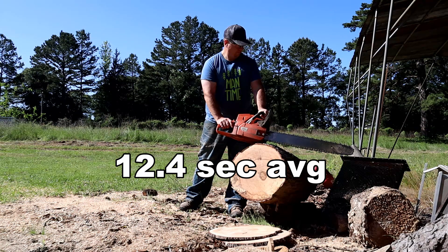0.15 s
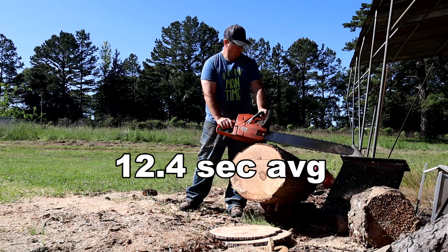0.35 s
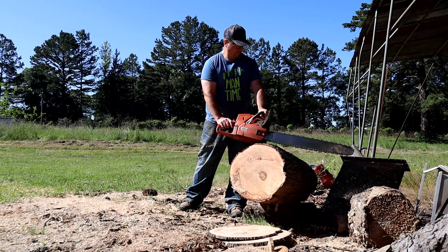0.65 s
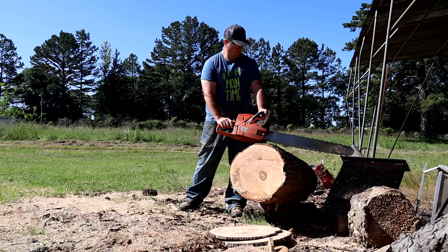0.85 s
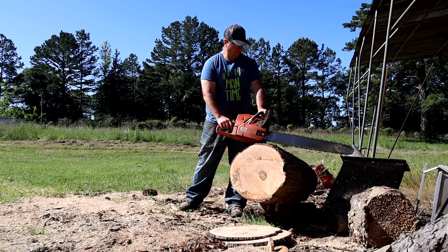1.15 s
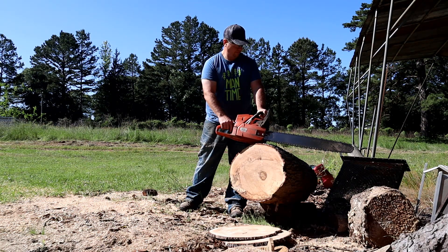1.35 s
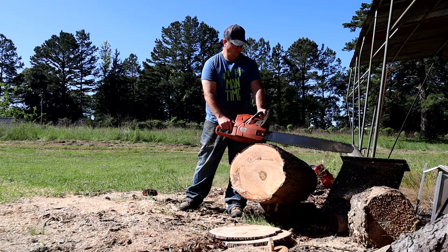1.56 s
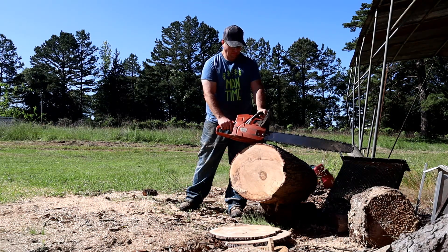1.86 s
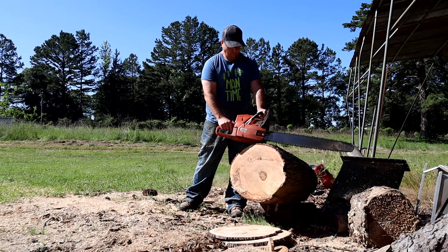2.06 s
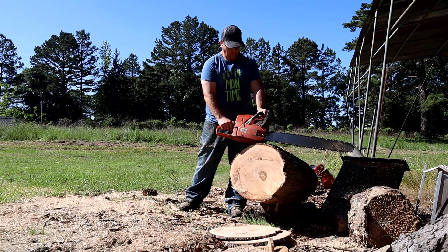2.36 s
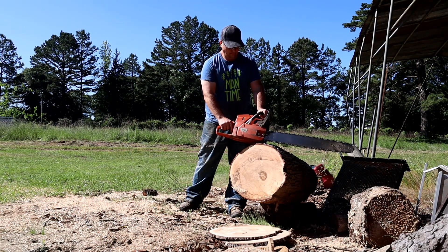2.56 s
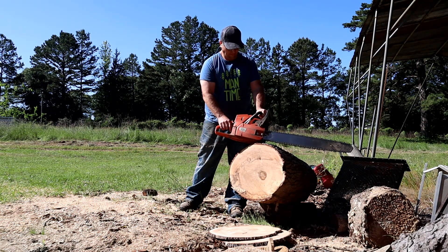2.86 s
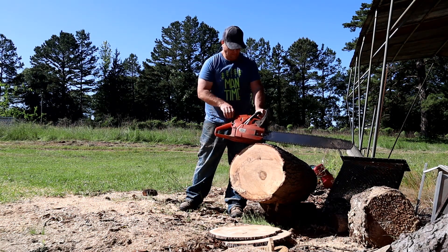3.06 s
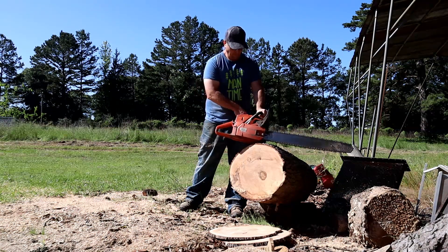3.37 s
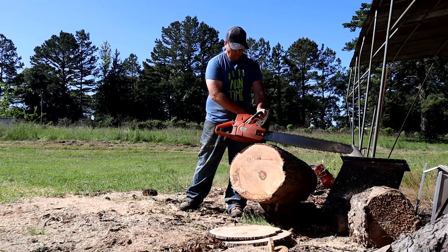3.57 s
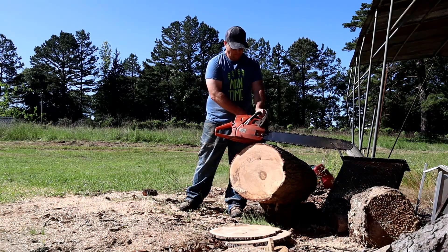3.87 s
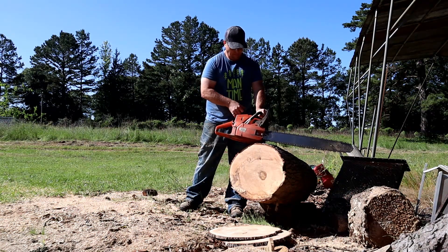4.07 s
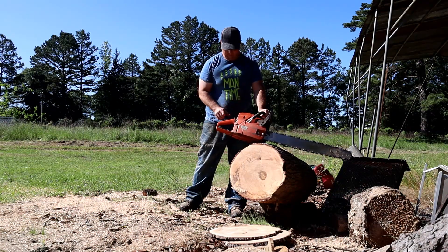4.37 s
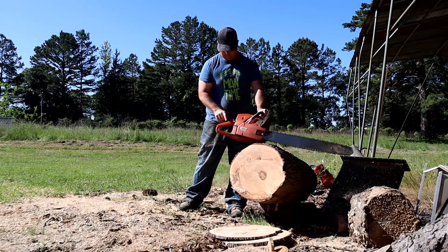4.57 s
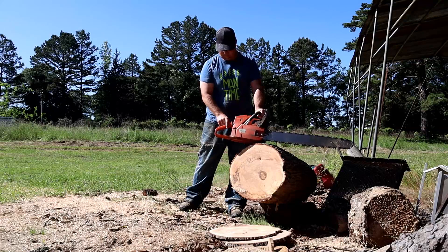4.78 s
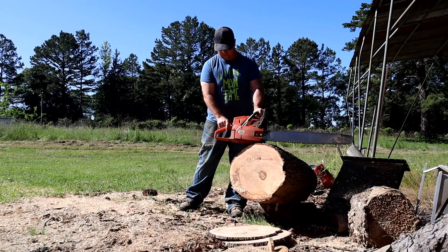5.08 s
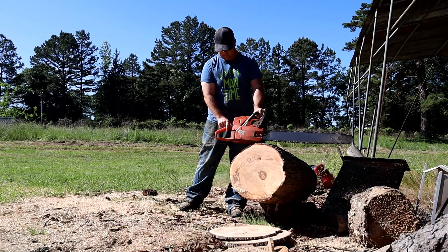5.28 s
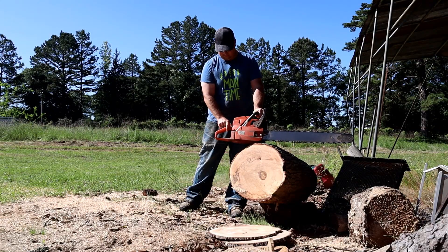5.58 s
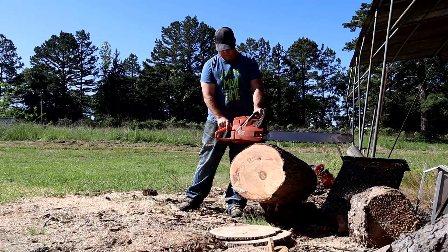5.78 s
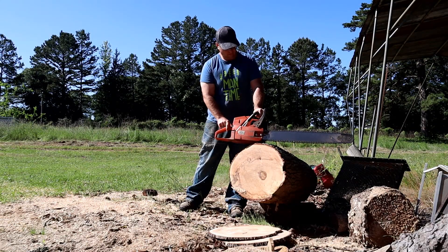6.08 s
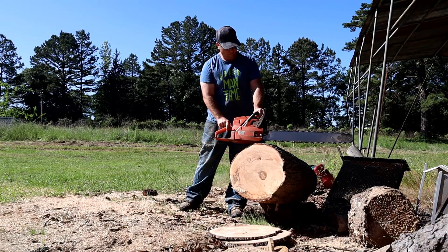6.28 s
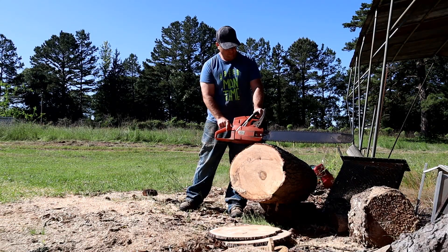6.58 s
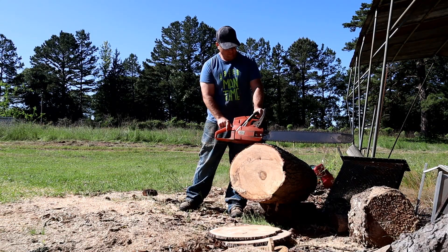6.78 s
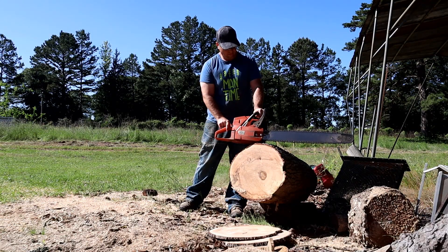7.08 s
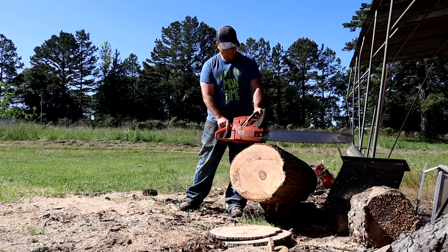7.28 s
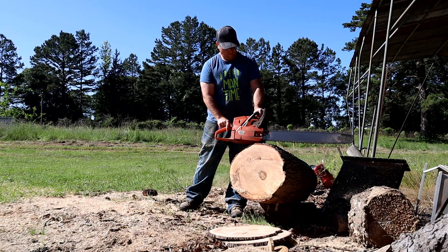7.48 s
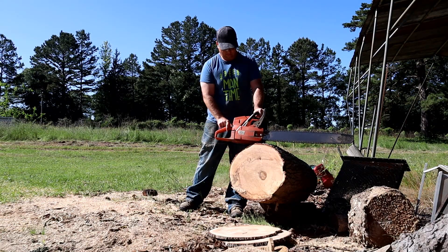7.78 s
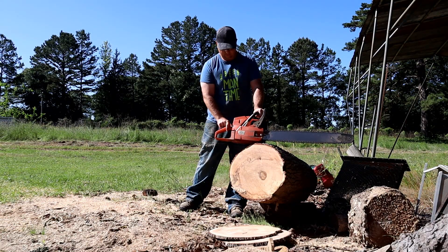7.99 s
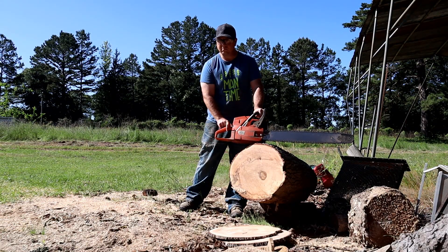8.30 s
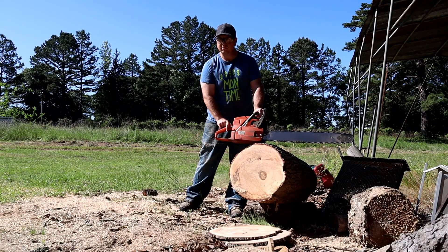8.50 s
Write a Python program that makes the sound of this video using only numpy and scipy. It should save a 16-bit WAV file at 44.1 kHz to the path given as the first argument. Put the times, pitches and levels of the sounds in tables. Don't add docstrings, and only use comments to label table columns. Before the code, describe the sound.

Rough two-stroke chainsaw idle, irregular sharp bangs between softer puffs, loose parts rattling and a thin high metal whine coming and going.

```python
import sys
import numpy as np
from scipy import signal
from scipy.fft import rfft, irfft
from scipy.io import wavfile
from scipy.ndimage import uniform_filter1d

SR = 44100
rng = np.random.default_rng(int(sys.argv[2]) if len(sys.argv) > 2 else 0)


def file_out(sig):
    cols = np.atleast_2d(sig).T
    lim = np.clip(cols, -1, 1)
    pcm = np.round(lim * 32767).astype(np.int16)
    wavfile.write(sys.argv[1], SR, pcm)


def makeup_ratio(level_db):
    decades = np.asarray(level_db, float) / 20
    return 10 ** decades


N = 381024
T = np.arange(N) / SR


def level(x, db):
    return x * makeup_ratio(db) / np.sqrt(np.mean(x ** 2))


def colour(x, table):
    hz, db = np.transpose(table)
    f = np.arange(N // 2 + 1) * SR / N + 1
    gain = makeup_ratio(np.interp(np.log(f), np.log(hz), db))
    return irfft(rfft(x) * gain, N)


def noise(table):
    return colour(rng.standard_normal(N), table)


def train(times, sizes, shape):
    clicks = np.zeros(N + SR)
    starts = np.round(np.clip(times, 0, None) * SR).astype(int)
    np.add.at(clicks, starts, sizes)
    return signal.fftconvolve(clicks[:N], shape)[:N]


def push(delay_ms, length_ms):
    puff = np.hanning(int(length_ms * SR / 1000) + 1)
    return np.r_[np.zeros(int(delay_ms * SR / 1000)), puff / puff.sum()]


def dying_sine(t, hz, t60_s):
    return np.sin(2 * np.pi * hz * t) * np.exp(-np.log(1000) * t / t60_s)


def rings(modes):
    t = T[:SR // 10]
    return sum(gain * dying_sine(t, hz, t60_ms / 1000) for hz, t60_ms, gain in modes)


def burst(rise_ms, fall_ms):
    ms = T[:SR // 10] * 1000
    shape = (1 - np.exp(-ms / rise_ms)) ** 2 * np.exp(-ms / fall_ms)
    return shape / shape.max()


def resonance(x, hz, q):
    return signal.lfilter(*signal.iirpeak(hz, q, fs=SR), x)


FULL_BURNS = [.0949, .3723, .4629, .6987, 1.0452, 1.5969, 2.8712, 3.1927, 3.5173, 4.0245, 4.1311, 4.3799,
              4.6478, 5.1595, 6.2493, 6.3248, 6.6796, 6.8631, 6.9925, 7.0661, 7.3955, 7.6209, 8.5407]
# start in seconds, burn strength
PARTIAL_BURNS = [(.299, .92), (.6086, .96), (.7888, .96), (.9722, .92), (1.134, .96), (1.3749, .92),
                 (1.7061, .96), (1.966, .96), (2.0959, .8), (2.3873, .84), (2.6579, .92), (3.1181, .96),
                 (3.6851, .8), (3.875, .84), (3.9499, .92), (4.2177, .84), (4.289, .92), (4.5762, .92),
                 (4.8469, .96), (5.0691, .96), (5.6485, .96), (5.8974, .88), (6.4177, .96), (6.4912, .84),
                 (7.3182, .92), (7.7326, .84), (8.0006, .8), (8.3065, .92),
                 (.0193, .76), (.5535, .64), (.8603, .56), (1.2808, .64), (1.4849, .64), (1.5404, .52),
                 (1.8895, .68), (2.5207, .52), (2.9644, .76), (3.3228, .56), (3.361, .56), (3.7987, .6),
                 (4.4849, .64), (4.791, .52), (4.9758, .6), (5.0316, .52), (5.3595, .64), (5.5127, .72),
                 (5.8009, .52), (5.8395, .6), (6.051, .6), (6.1099, .68), (6.5466, .6), (7.4875, .68),
                 (7.9427, .72), (8.1336, .52), (8.1715, .6), (8.4808, .52), (8.616, .55)]
WEAK_BURNS = [.9344, 2.2894, 2.5788, 2.734, 2.7924, 3.0403, 3.2845, 3.458, 3.5906, 3.7413, 4.5395, 4.7181,
              4.9386, 5.2475, 5.2844, 5.474, 5.5901, 5.723, 5.973, 6.6031, 8.2285, 8.2675]


def crank():
    turn_s = 18.8 / 1000
    slowing_ms, slowing_turns = 1.9, 2.3
    coast_ms_per_turn, wobble_ms = .06, .15
    clearing_turns, sputter_chance, sputter_burn = 3.2, .62, (.1, .3)

    full = [(s, 1.06) for s in FULL_BURNS]
    weak = [(s, .42) for s in WEAK_BURNS]
    fired = sorted(full + PARTIAL_BURNS + weak)
    fired = [(fired[0][0] - turn_s, 0.)] + fired + [(fired[-1][0] + turn_s, 0.)]
    times, burn = [fired[0][0]], [fired[0][1]]
    for (t0, kick), (t1, strength) in zip(fired, fired[1:]):
        turn = np.arange(round((t1 - t0) / turn_s))
        slowing = kick ** 2 * slowing_ms * np.tanh(turn / slowing_turns)
        drag = (slowing + coast_ms_per_turn * turn) / 1000
        drag = drag + wobble_ms / 1000 * rng.standard_normal(len(turn))
        mean_turn = (t1 - t0 - drag.sum()) / len(turn)
        times += list(t0 + np.cumsum(drag + mean_turn))
        lights = rng.random(len(turn)) < sputter_chance
        cleared = turn + 1 > clearing_turns * kick
        sputter = rng.uniform(*sputter_burn, len(turn)) * lights * cleared
        burn += list(sputter[:-1]) + [strength]
    return np.array(times), np.array(burn)


# burn strength from 0 to 1, blow-out length in ms, suck-back volume,
# suck-back delay in ms, suck-back length in ms, sweep volume.
GAS_EXCHANGE = [(0, .5, .45, .2, 1.69, .78), (.15, .52, .6, .66, 1.2, .88), (.3, .7, .8, .6, 1.85, 1.04),
                (.6, .99, .8, .59, 2.17, .9), (1, 1.05, 0, .65, 2.06, .2)]
# frequency in Hz, t60 in ms, signed gain.
MUFFLER_RINGS = [(169, 19.4, 1.336), (305, 10.5, 2.551), (262, 4.0, -8.999), (519, 11.9, 0.583),
                 (677, 17.7, -0.175), (915, 20.5, 0.332), (1231, 11.9, -0.409)]
# frequency in Hz, t60 in ms, signed gain.
INTAKE_RINGS = [(204, 50.4, 0.036), (323, 33.7, 0.125)]
# frequency in Hz, gain in dB.
EXHAUST_COLOUR = [(100, 2), (250, 1), (420, 1.5), (560, 1), (690, -2), (860, 2.5), (960, -2.5), (1250, 1),
                  (1800, 8.5)]


def exhaust(times, burn):
    chance = rng.standard_normal((len(times), 3)).T
    blow = burn + (burn == 0) * .045 * np.abs(chance[0])
    strength, *columns = np.transpose(GAS_EXCHANGE)
    out_ms, back, back_delay, back_ms, sweep = [np.interp(blow, strength, c) for c in columns]
    flow, shock = np.zeros((2, N + SR))
    for i, s in enumerate(times):
        at = round(s * SR)
        steepness = min(blow[i], 1.05) ** 2.5
        blow_out = blow[i] * push(.22, out_ms[i])
        suck_back = -back[i] * push(back_delay[i], back_ms[i])
        for puff in (blow_out, suck_back):
            flow[at:at + len(puff)] += puff
            shock[at:at + len(puff)] += puff * steepness
    flow = flow[:N] + train(times, sweep * makeup_ratio(.7 * chance[1]), push(.4, 2.85))
    slap = train(times, (1 - .27 * burn) * makeup_ratio(1.5 * chance[2]), push(7.04, .3))
    parts = (flow, MUFFLER_RINGS[:-1]), (shock[:N], MUFFLER_RINGS[-1:]), (slap, INTAKE_RINGS)
    sound = sum(signal.fftconvolve(drive, rings(modes))[:N] for drive, modes in parts)
    return makeup_ratio(-0.27) * colour(sound, EXHAUST_COLOUR)


# frequency in Hz, level in dB per Hz.
SPIT_COLOUR = [(700, 7), (1200, -17), (1550, -5.5), (2400, 1), (3600, 2), (5200, -5.5), (6200, -15),
               (8600, 5.5), (10800, -9), (13300, -15.5), (15000, -30)]
# frequency in Hz, level in dB per Hz.
HISS_COLOUR = [(700, -10), (1200, 0), (1600, -17), (2350, 5), (2800, -8), (3700, 0), (5000, -9), (6100, -3),
               (8600, -11.5), (11000, -18.5), (13300, -12)]


def crack(times, burn):
    scatter = makeup_ratio(rng.standard_normal(len(times)))
    spit = level(noise(SPIT_COLOUR), -15.5)
    hiss = level(noise(HISS_COLOUR), -22.5)
    spit = spit * train(times + 0.001, burn ** 1.68 * scatter, burst(1.2, .5))
    hiss = hiss * train(times + 0.00024, burn ** 2.0 * scatter, burst(1.0, 4.2))
    return spit + hiss


# frequency in Hz, level in dB per Hz.
RATTLE_COLOUR = [(400, -12), (800, 2.5), (1250, -2.5), (1700, -9.5), (2400, -4), (3600, -9.5), (4500, -15),
                 (6000, -12.5), (8800, -10.5), (10500, -21.5), (13200, -20.5), (14300, -39), (15500, -56)]
# frequency in Hz, width in Hz, gain in dB.
CASE_MODES = [(1628, 59, -6), (1933, 78, 3), (2777, 17, -4.5), (3060, 70, -9), (3410, 65, -5),
              (3680, 82, -14.5), (6370, 13, -62)]


def rattle(times, burn):
    chance = rng.standard_normal((len(times), 2)).T
    hardness = makeup_ratio(1.5 * chance[0]) * makeup_ratio(2.4 * np.roll(burn, 1))
    slaps = times - .0045 + 0.00085 * chance[1]
    gate = 0.34 + train(slaps, hardness, burst(0.94, 14.0))
    flutter_db = 0.8 * uniform_filter1d(rng.standard_normal(N), 40) * np.sqrt(40)
    shake = gate * rng.standard_normal(N) * makeup_ratio(flutter_db)
    case = sum(makeup_ratio(db) * resonance(shake, hz, hz / width) for hz, width, db in CASE_MODES)
    cover = resonance(shake, 3850, 14.) * np.interp(T, [4.9, 5.4], [.2, 1])
    return level(colour(shake, RATTLE_COLOUR), -35) + level(case, -40) + level(cover, -54)


# start in seconds, level in dB.
DRUM_BRUSHES = [(.376, -41), (.47, -45), (0.699, -37), (1.049, -34), (1.14, -39), (1.169, -32), (1.39, -45),
                (1.72, -39), (1.97, -40), (4.028, -29.5), (4.135, -32), (4.176, -29.5), (4.383, -42),
                (4.6, -30), (4.659, -31), (5.04, -40), (5.17, -32), (6.691, -31), (7.4, -47)]
# frequency in Hz, t60 in seconds, gain in dB.
DRUM_RINGS = [(4056, 1.5, 0), (9076, .2, -2)]


def drum():
    out = np.zeros(N)
    for s, db in DRUM_BRUSHES:
        t = T[T >= s] - s
        song = sum(makeup_ratio(gain) * dying_sine(t, hz, t60) for hz, t60, gain in DRUM_RINGS)
        out[-len(t):] = makeup_ratio(db - 5) * song * (1 - np.exp(-t / 0.002))
    waver = uniform_filter1d(rng.standard_normal(N), size=900) * 30
    return out * makeup_ratio(2.5 * waver - 1)


def turn_away(treble):
    bright = colour(treble, [(8000, -45), (11000, -2), (13500, 0)])
    return treble - bright * np.interp(T, [4.9, 5.4, 7.2, 7.6], [0.11, .3, 0.26, 0.48])


def lean_right(treble):
    def ear(side):
        return colour(treble, [(1000, 0.009), (4000, side * 0.5), (9000, side * 0.32), (12500, side * 6.4)])
    return np.array([ear(-1), ear(1)])


# frequency in Hz, gain in dB.
SHED_COLOUR = [(100, -14.5), (300, -43), (600, -30), (1200, -11), (2500, -12.5), (5000, -3.5), (8500, -7),
               (12500, 4)]


def shed(x, t60_s, db):
    t = T[:SR // 4]
    tail = rng.standard_normal((2, len(t))) * np.exp(-np.log(1000) * t / t60_s) * (t > .001)
    tail = tail / np.sqrt(np.sum(tail ** 2) / 2)
    return makeup_ratio(db) * signal.fftconvolve(colour(x, SHED_COLOUR)[None], tail, axes=1)[:, :N]


# frequency in Hz, level in dB per Hz.
AIR_COLOUR = [(20, -13), (60, -6), (200, -3), (600, 8), (1500, -20.5), (15000, -51)]


def open_air():
    middle, side = [level(noise(AIR_COLOUR), db) for db in (-44, -51)]
    return middle + side * np.array([[1], [-1]])


def scene():
    times, burn = crank()
    low = exhaust(times, burn)
    treble = turn_away(crack(times, burn) + rattle(times, burn) + drum())
    return low + lean_right(treble) + shed(treble + low, 0.062, -4) + open_air()


def band_limit(x):
    return signal.sosfilt(signal.butter(12, 15710, fs=SR, output="sos"), x)


# frequency in Hz, gain in dB.
MICROPHONE_COLOUR = [(20, -45), (42, -14), (60, -10.5), (85, -4), (105, -1), (13800, 1), (14800, -18),
                     (15700, -36)]


def record(dry):
    heard = np.clip([colour(side, MICROPHONE_COLOUR) for side in dry], -1, 1)
    return band_limit(heard)


dry = scene()
out = record(dry)
file_out(out)
```